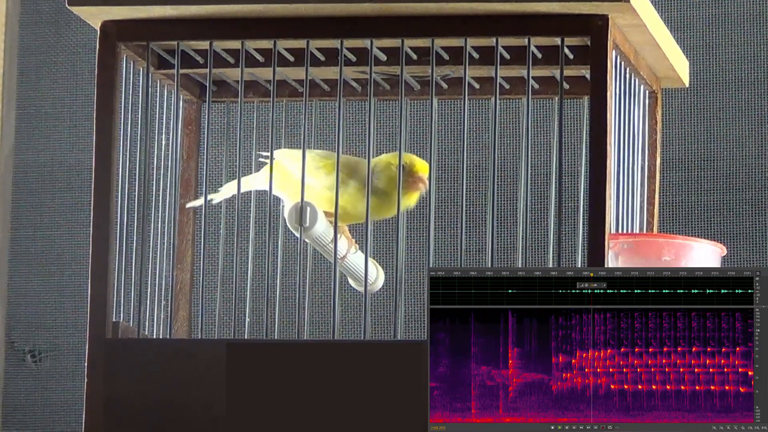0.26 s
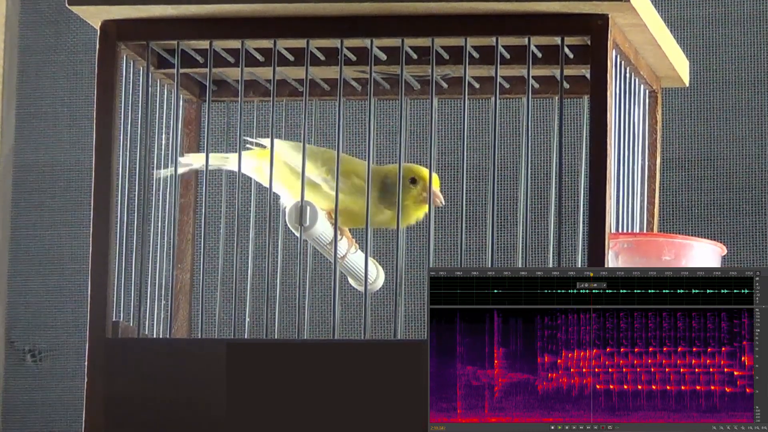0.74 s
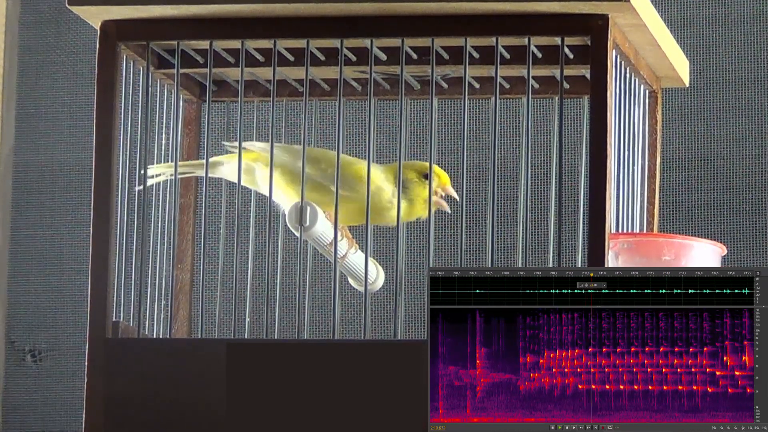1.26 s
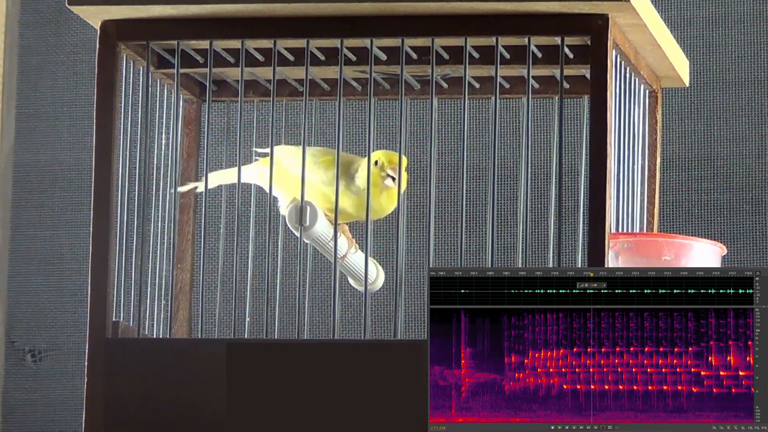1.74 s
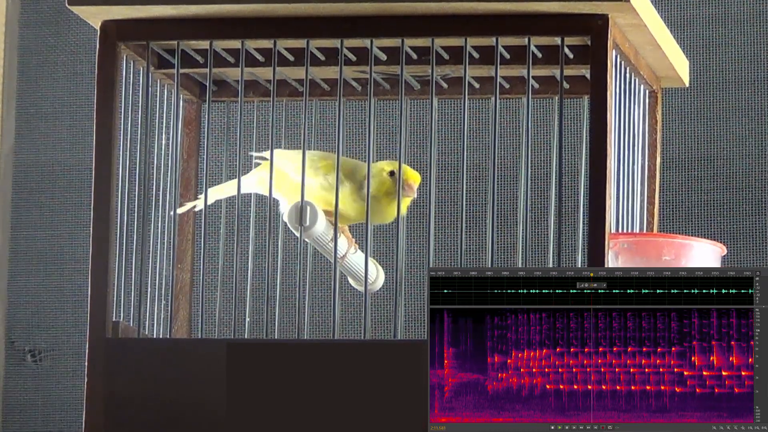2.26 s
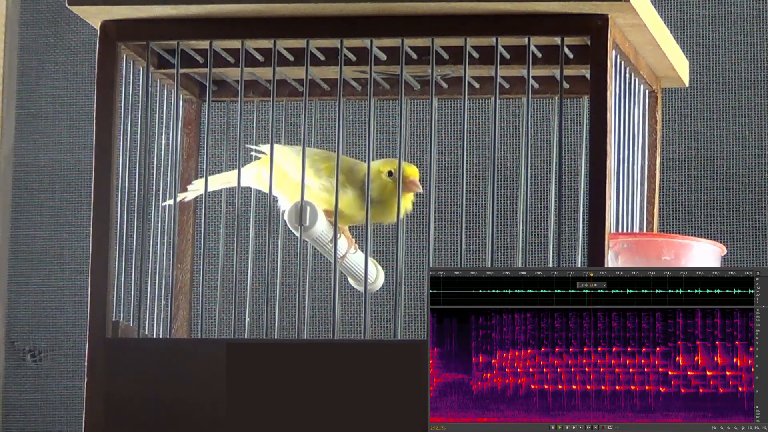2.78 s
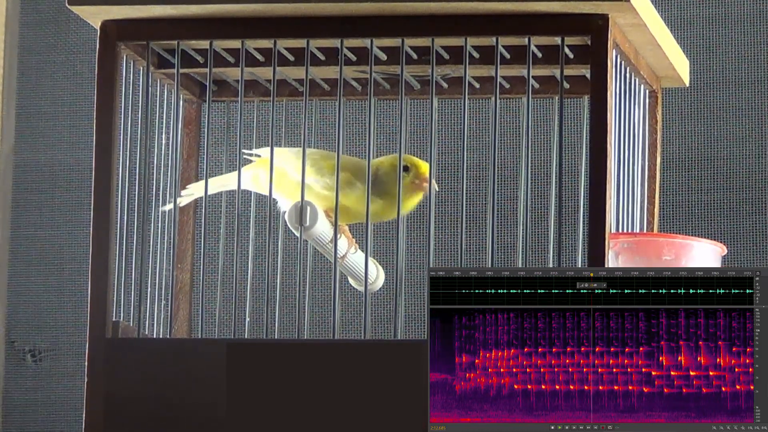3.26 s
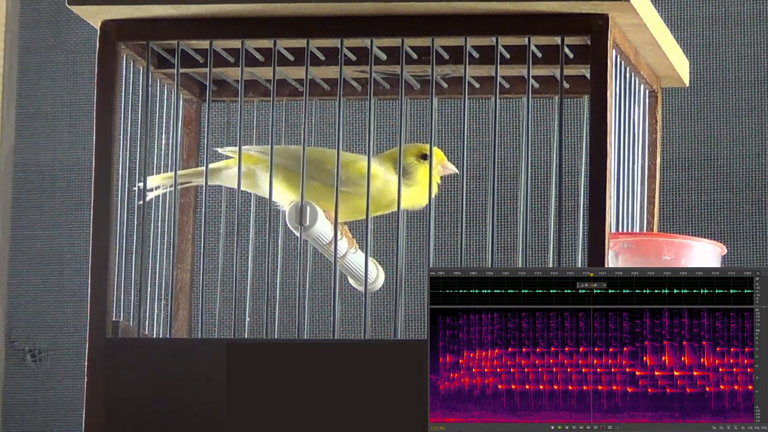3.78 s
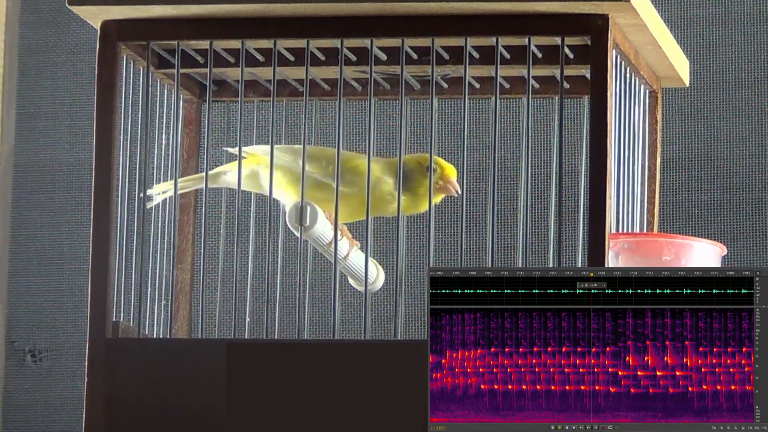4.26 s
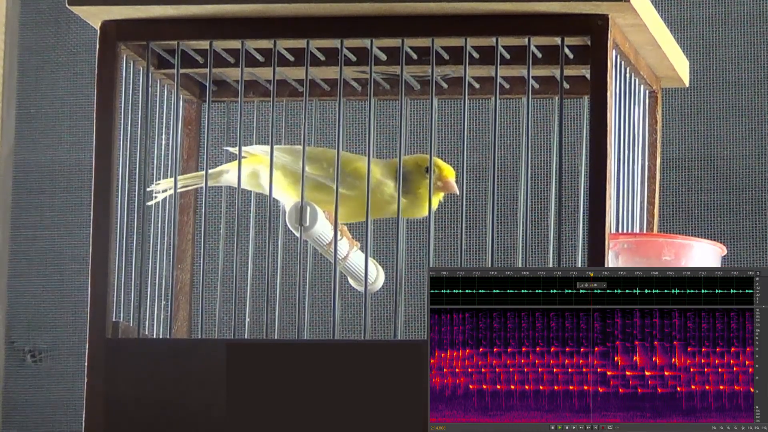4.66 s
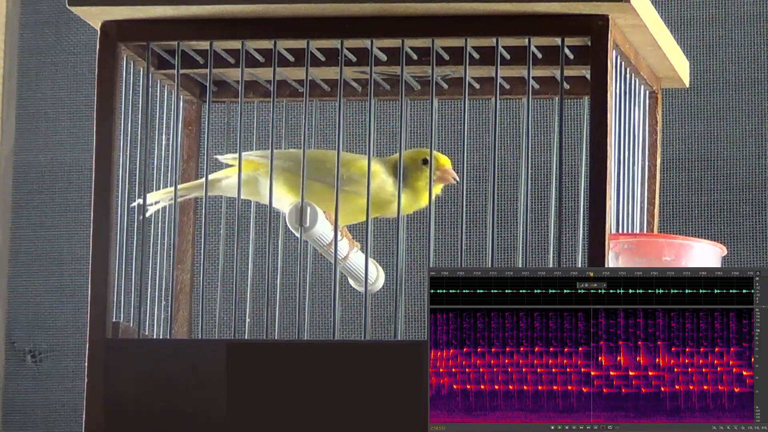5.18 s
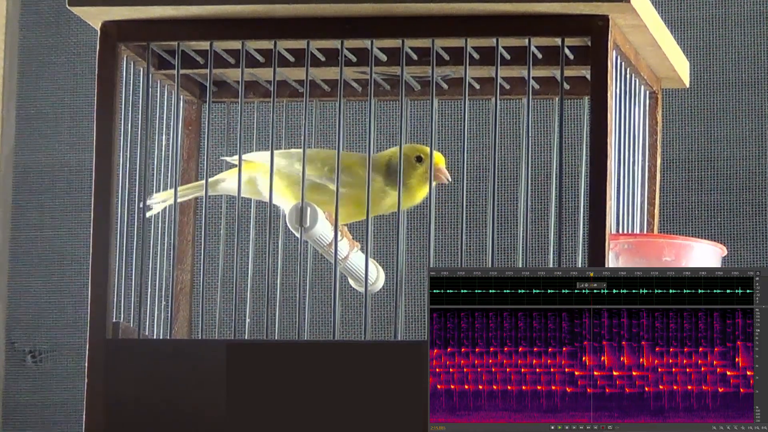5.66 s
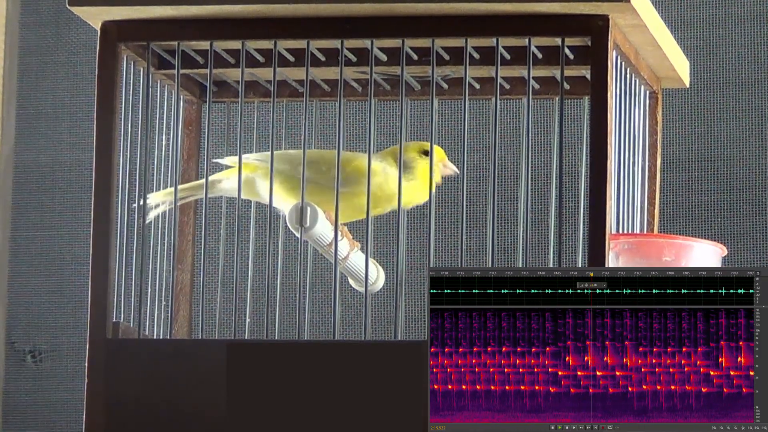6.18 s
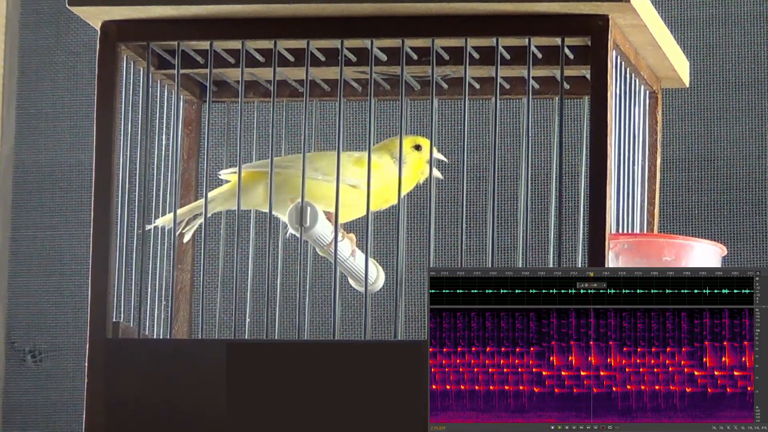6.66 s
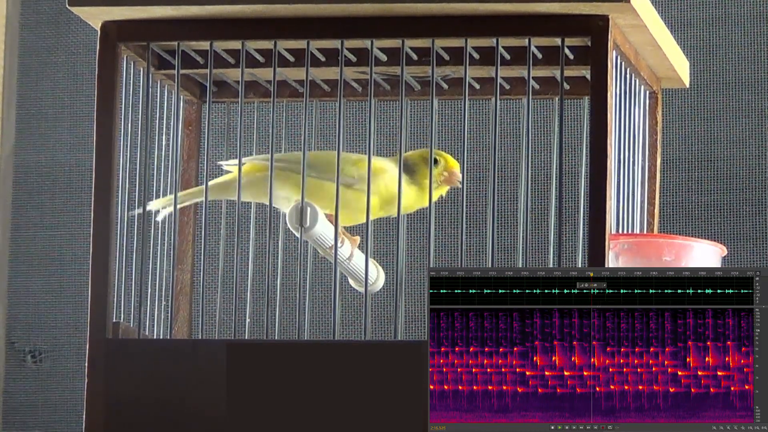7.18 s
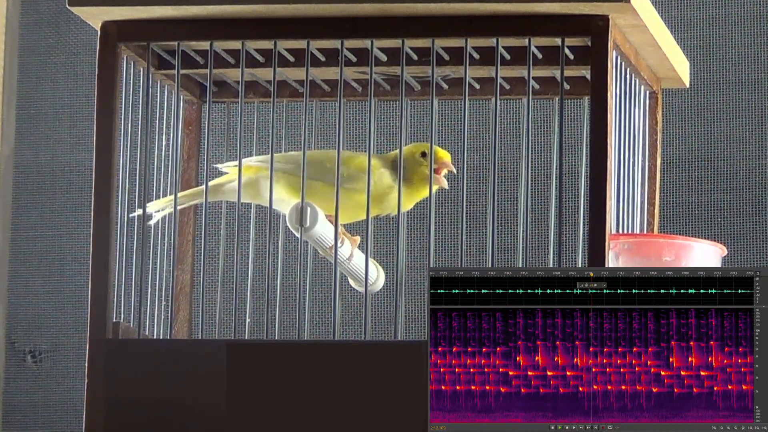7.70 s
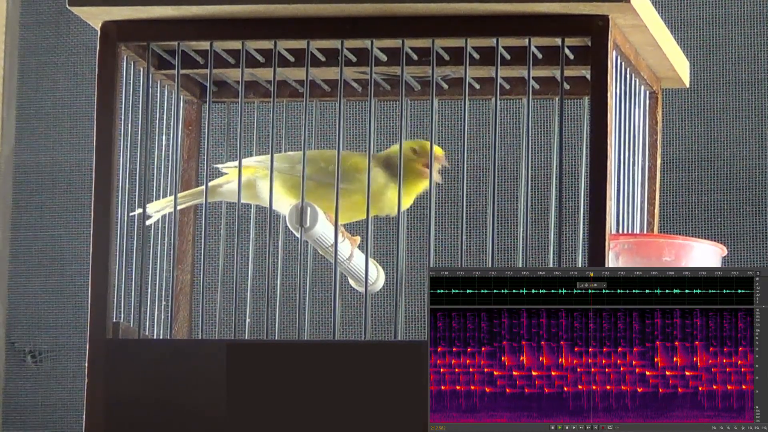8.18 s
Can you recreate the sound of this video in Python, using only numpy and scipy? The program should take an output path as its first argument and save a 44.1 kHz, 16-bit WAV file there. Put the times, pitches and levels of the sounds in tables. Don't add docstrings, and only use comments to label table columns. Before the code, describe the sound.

Close canary song in a small hard room: rapid repeating high whistles, four swooping phrases with piercing drops, then the quick pattern again, faint hum behind.

```python
import sys
import numpy as np
from scipy import signal
from scipy.io import wavfile
from scipy.ndimage import uniform_filter1d

SR = 44100
rng = np.random.default_rng(int(sys.argv[2]) if len(sys.argv) > 2 else 0)


def undo_db(level):
    steps = np.asarray(level, float) / 20
    return 10 ** steps


def output_pcm(signal):
    pcm = np.clip(np.atleast_2d(signal).T, -1, 1) * 32767
    wavfile.write(sys.argv[1], SR, np.round(pcm).astype(np.int16))


N = 372204
PAD = 16384

# head start in seconds, scoop as share of pitch, glide speed,
# place of the peak from 0 to 1, fullness, overtones from the second up in dB, roughness.
LIFT = (0.0073, -0.025, 1.99, 0.61, 1.28, (-27, -27), 0.43)
HIGH = (0.0055, -0.027, 1.9, 0.4, 0.91, (-24, -23.5), 0.64)
MID = (0.001, 0.0068, 1.53, 0.55, 0.64, (-34, -33, -35), 0.64)
LOW = (0.008, 0.072, 1.33, 0.42, 0.71, (-68, -35, -38, -40.5, -42, -44.5), 0.093)
LONG = (.011, .008, 1.55, 0.32, 0.82, (-37, -31.5, -28.5), 0.21)
LEAD_IN = (.013, 0.013, 1.15, 0.78, 1.08, (-24.5, -20), 0.37)
HOOK = (0.006, -0.025, 2.87, 0.65, 0.9, (-29, -29.5), 0.49)
TOP = (0.0033, -0.0085, 3.1, 0.78, 0.4, (-16,), .4)
DROP = (-.002, 0.0016, 4.7, 0.61, 0.91, (-29.5, -24.5), 1)
SINK = (0.011, 0.06, 0.95, 0.61, 0.98, (-56, -33.5, -34, -46, -42, -42), .09)
UP = (0.00082, -0.021, 1.7, 0.46, 0.3, (-26.5, -29), 0.82)
RASP = (0.00079, -0.042, 2.1, 0.46, 0.73, (-23.5, -24), 0.98)
SWOOP = (0.005, -0.01, 2.6, 0.49, 1, (-40, -24.5), .2)
# length in seconds, pitch factor at start, pitch factor at end, manner as above.
TICK = (0.0039, 1.026, 0.92, (0.0013, 0.01, 0.37, 0.31, 1, (-26.5, -25.5), 4.4))
CLICK = (0.027, 1, 1.12, (0.0008, .0035, 0.32, 0.43, 0.98, (-20.5,), 2.6))
CHIP = (0.0078, 1.106, 0.91, (0.00057, 0.0035, 1, 0.48, 5.5, (-31, -29.5, -36), 2.3))
PEEP = (0.018, 0.95, 1.01, (0.00043, -0.046, 2.6, 0.53, 0.69, (-26, -35.5, -34), 0.71))
DIP = (0.01625, 1.4, 0.93, (0.0011, 0.035, 2.89, 0.57, 1.32, (-46.5, -34), 1))
BLIP = (0.0184, 1.6, 0.93, (0.00283, 0.029, 2.8, 0.55, 0.3, (-24,), .3))
GULP = (0.0182, 1.45, 0.826, (0.00169, 0.015, 1.1, 0.25, 0.21, (-56,), .3))
MUTTER = (0.028, 1.1, 1, (0.00395, 0.011, 2.3, 0.24, .4, (-25,), .6))
SHIVER = {HIGH: (0.11, 0.0038), TOP: (0.13, 0.0018), LIFT: (0.31, 0.0028), HOOK: (0.23, 0.0022),
          SWOOP: (0.11, .003), UP: (0.54, 0.02), BLIP[3]: (0.55, 0.018), GULP[3]: (0.54, .03),
          MUTTER[3]: (0.31, 0.045), TICK[3]: (0.16, 0.002), LONG: (0.048, 0.0027), SINK: (0.064, 0.0015),
          RASP: (0.18, 0.013)}
SCOOP_SPAN = {LOW: 0.063, HIGH: 0.11, SINK: 0.12, PEEP[3]: 0.05, LIFT: 0.12, HOOK: 0.096}

# start in seconds, effort in dB.
WARBLES = [
    (-.139, -2.5),
    (.236, -1),
    (0.617, -1),
]
# wait in seconds, length in seconds, from Hz, to Hz, level in dB.
WARBLE_NOTES = [
    (0.021, 0.0096, 3100, 3570, -36),
    (0.025, 0.023, 3980, 4410, -32),
    (0.053, 0.031, 4880, 5340, -25.5),
    (0.072, 0.02, 2600, 2950, -36.5),
    (0.095, 0.013, 2680, 2140, -44.5),
    (0.102, .055, 2108, 2890, -41),
]
# start in seconds, wait for the whistle in seconds,
# lift level in dB, whistle level in dB, lift left-right in dB.
RISES = [(0.097, 0.018, -31, -27.5, 10), (0.472, 0.0077, -24.5, -28.5, 11), (0.844, 0.019, -26, -29, 9),
         (1.268, 0.022, -27, -29.5, 14), (1.705, 0.019, -24, -27, 14), (2.143, 0.02, -25.5, -27, 14),
         (2.582, 0.022, -24.5, -26.5, 17.5), (3.026, 0.02, -25, -27, 17), (3.478, 0.019, -23, -28, 14),
         (3.94, .017, -20, -28.5, 15), (4.397, 0.016, -21.5, -29, 11.5), (4.836, 0.021, -23, -28.5, 15),
         (7.719, 0.016, -19, -28, 12.5), (8.165, 0.015, -21, -25, 11)]
# time in seconds, lift from Hz, lift to Hz, whistle from Hz, whistle to Hz.
REGISTER = [(0.101, 3900, 4220, 4980, 5106), (0.477, 3790, 4210, 4860, 5420),
            (0.848, 3740, 4376, 5160, 5794), (1.269, 4060, 4300, 5665, 5800),
            (2.201, 4120, 4410, 5770, 5824), (3.031, 4160, 4377, 5920, 5904),
            (3.502, 4070, 4360, 5660, 5990), (3.95, 4074, 4416, 5920, 5860), (4.4, 4105, 4420, 5720, 5790),
            (4.841, 4070, 4320, 5914, 5897), (7.72, 4160, 4390, 5886, 5867), (8.17, 4260, 4450, 5740, 5820)]
# start in seconds, mid level in dB, low level in dB,
# low pitch in Hz, mid left-right in dB.
FALLS = [(-.19, -35, -28.5, 2567, -12), (.18, -20.5, -38, 2612, -9.5), (.556, -19.5, -35.5, 2597, -8.5),
         (.938, -21.5, -32, 2273, -3), (1.362, -21.5, -31.5, 2259, -10), (1.799, -22, -31, 2249, -17.5),
         (2.233, -24.5, -30.5, 2250, -18.5), (2.675, -25, -31.5, 2232, -23.5), (3.123, -22, -32, 2197, -13),
         (3.578, -18.5, -33, 2197, 10.5), (4.039, -20, -35, 2209, 10.5), (4.493, -20.5, -34.5, 2207, 3),
         (4.939, -19, -35.5, 2049, 15), (7.819, -19.5, -32.5, 2239, 4), (8.257, -18.5, -30, 2214, 0.5)]
# chip start in seconds, blip level in dB, chip level in dB, dip level in dB.
RATTLES = [(1.078, -59, -28.5, -38), (1.498, -56.5, -29, -38), (1.937, -63.5, -27, -37.5),
           (2.38, -57.5, -25.5, -38.5), (2.821, -60, -27.5, -38), (3.267, -61.5, -26.5, -37.5),
           (3.727, -63, -28.5, -40), (4.185, -57, -28.5, -36.5), (4.639, -56.5, -27.5, -36),
           (7.519, -76, -28.5, -36.5), (7.967, -59, -28, -34.5), (8.405, -55, -26, -36)]
# wait after the chip in seconds, pitch in Hz, left-right in dB.
TUMBLE = [
    (-.022, 1353, 18),
    (.001, 3016, 8),
    (.052, 2170, 17),
    (.067, 1103, 18),
]
# start in seconds, level in dB, pitch in Hz, left-right in dB.
TICKS = [(1.1142, -23, 4660, 2), (1.5348, -22.5, 4610, 4), (1.973, -27.5, 4630, 8), (2.4155, -25, 4654, 12),
         (2.8558, -23, 4735, 9), (3.3037, -25, 4700, 6), (3.7622, -24.5, 4670, 1), (4.2204, -22.5, 4664, 1),
         (4.6736, -22, 4700, 0.5), (7.5562, -21, 4615, -1.5), (8.0035, -21.5, 4630, -1),
         (8.437, -43, 4550, 3)]
# start in seconds, length in seconds, from Hz, to Hz, level in dB, left-right in dB.
STRAY_TICK = (4.926, .01, 5800, 4100, -38, 8.5)
# start in seconds, wait for the peep in seconds,
# starting pitch in Hz, whistle level in dB, peep level in dB.
LONGS = [
    (5.217, 0.12, 3410, -22, -26.5),
    (5.807, 0.13, 3400, -20.5, -26.5),
    (6.403, .124, 3430, -20, -25),
    (7.004, 0.13, 3420, -24.5, -27),
]
# lead in seconds, length in seconds, from Hz, to Hz, level in dB.
SNAPS = [
    (0.027, 0.005, 3900, 4500, -54),
    (.017, .006, 5650, 5750, -53),
]
# start in seconds, wait for the whistle in seconds,
# lift level in dB, whistle level in dB, lift pitch in Hz.
HOOKS = [
    (5.472, 0.012, -17.5, -36, 4689),
    (6.05, 0.025, -17, -30.5, 4691),
    (6.654, 0.019, -18, -28, 4704),
    (7.255, 0.019, -20, -31, 4570),
]
# start in seconds, drop level in dB, dip level in dB, low whistle level in dB,
# low pitch in Hz.
DROPS = [
    (5.576, -18.5, -48.5, -35.5, 2002),
    (6.158, -16.5, -50, -35.5, 2004),
    (6.76, -19.5, -47.5, -34, 2005),
    (7.367, -18, -56, -32.5, 2107),
]

HEAD_LAG = {SINK: [(5.6, 0.54)], LOW: [(3.4, 1.3), (4.2, 0.48)], LONG: [(6.0, 0.93), (6.3, 2)],
            MID: [(.5, 1.44), (.9, 1.03), (1.4, 4.5), (1.8, 0.011), (3.2, 0.011), (3.5, 3.9)],
            CHIP[3]: [(3.4, -0.78), (3.7, 0.041)], PEEP[3]: [(5.0, -1.57)], DIP[3]: [(4.8, 2.17),
            (7.5, 0.013)]}
# time in seconds, added left-right in dB.
SWING = [(0, 2.5), (1.2, 1.7), (2.2, -2), (3.1, -2.5), (3.7, 2), (4.3, 1.5), (4.8, 0.5), (5.3, 3), (5.7, 1),
         (6.2, 2), (6.7, 1.5), (7.2, 5), (7.7, 0), (8.3, -1.4)]
# time in seconds, added left-right in dB.
LOW_SIDES = [(0.938, -0.5), (1.362, -0.8), (1.799, 4.5), (2.233, 6.5), (2.675, 8.5), (3.123, 8),
             (3.578, 2.5), (4.039, 3), (4.493, 8), (4.939, -3), (7.819, 5), (8.257, -1.5)]
MID_SIDES = [(0.18, 1.5), (0.556, -2), (0.938, -3.5), (1.362, 6.5), (1.799, 11.5), (2.233, 11.5), (2.675, 8),
             (3.123, 7.5), (3.578, -1.5), (4.039, -2), (4.493, 0), (4.939, -3.5), (7.819, 3.5), (8.257, 1.5)]
HIGH_SIDES = [(0.097, -2), (0.471, 2.5), (0.845, -1.8), (1.268, -4.5), (1.703, 0.5), (2.141, -2),
              (2.58, -2.5), (3.028, -2.5), (3.477, -1), (3.94, -3), (4.397, -3), (4.836, -4), (7.718, -4.5),
              (8.165, -5.5)]
LONG_SIDES = [(5.219, -5), (5.807, -3.5), (6.403, -2.5), (7.003, 0.5)]
TOP_SIDES = [(5.472, 0), (6.05, -10), (6.654, 1.5), (7.255, -6)]
SINK_SIDES = [(5.576, 2), (6.157, -1.5), (6.759, -3), (7.367, 5.5)]
HOOK_SIDES = [(5.472, -3.5), (6.05, -9), (6.654, 1.2), (7.255, -11)]

# delay in seconds, gain.
SPRAY = [
    [(0, 0.55), (.0031, 0.18), (.0056, 0.53), (.0085, -0.32), (.0117, 0.33), (.0187, 0.2), (.029, -0.24)],
    [(0, .95), (.0086, 0.14), (.013, -0.025), (.0258, -0.31)],
]
REBOUND = [
    [(0, 0.69), (.0023, 1), (.0045, -0.45), (.0098, 0.12), (.0145, 0.15), (.0185, -0.17), (.023, 0.19),
     (.027, -0.18)],
    [(.0002, 0.92), (.0041, .35), (.007, -0.1), (.0105, -1.1), (.019, 0.052), (.0265, -0.041)],
]
BOX_WALLS = [
    [(.0018, 0.2), (.0029, 0.089), (.0044, 0.24)],
    [(.0011, 1), (.0024, 0.25), (.0039, -1.3)],
]
ROOM_WALLS = [
    [(.0078, .16), (.0125, .24), (.0195, -.18)],
    [(.0069, -.16), (.0135, .22), (.021, .2)],
]
# frequency in Hz, time to fall by 60 dB in seconds.
ROOM_DECAY = [(1000, 1), (2200, 0.84), (3500, 1), (4500, 0.65), (6000, 0.57), (9000, 0.36), (14000, 0.4)]
# left in dB, right in dB.
ROOM_DB = [-0.5, -4]

# frequency in Hz, level in dB per Hz.
AIR_SPECTRUM = [(20, -26.5), (40, -31), (87, -14.5), (177, -18.5), (244, -18), (440, -21.5), (575, -22.5),
                (925, -28), (1700, -31), (2500, -25.5), (6000, -45), (9000, -48), (16000, -70)]
# frequency in Hz, left-right in dB.
AIR_SIDES = [(28, 27), (55, 8), (380, 10.5), (2380, 7.5), (15000, 11)]
# time in seconds, level in dB.
AIR_SWELL = [(0, -50.5), (1.2, -55.5), (2.6, -52), (3.798, -55.5), (5.4, -57), (6.802, -59.5), (8.44, -62)]
# time in seconds, firing pitch in Hz, level in dB.
DRONE = [(0, 222, -53), (1.499, 190, -55.5), (1.901, 188, -63.5), (2.2, 180, -59.5), (3.2, 172, -56.5),
         (3.751, 168, -67), (4.3, 166, -58.5), (5, 170, -61.5), (5.201, 170, -54), (5.6, 170, -53.5),
         (5.801, 178, -67), (6.349, 185, -65), (6.551, 135, -63.5), (7.099, 138, -66.5), (7.4, 144.8, -63),
         (8.44, 165, -64)]
# multiple of the firing pitch, level in dB, line width in Hz.
DRONE_ORDERS = [
    (1, -7.5, 1.76),
    (1.1, -13.5, 2.1),
    (2, -19, 1.7),
    (3, -18, 5.6),
]
# middle in seconds, half length in seconds, throb rise in dB, hum rise in dB.
LORRIES = [
    (2.72, 0.66, 9.5, 11),
    (5.5, 1, 8, 7),
    (3.75, 0.43, 9.5, -5),
    (1.9, .4, 10, 8),
]


def evened(x):
    return x / np.sqrt(np.mean(x ** 2) + 1e-20)


def wobble(count, hz):
    return evened(signal.lfilter([1], [1, -np.exp(-2 * np.pi * hz / SR)], rng.standard_normal(count)))


def bandpass(x, edges_hz):
    return signal.sosfilt(signal.butter(2, edges_hz, "band", fs=SR, output="sos"), x)


def left_right(db):
    return undo_db(np.array([[db], [-db]]) / 2)


def side_shift(manner, s):
    turns = {LOW: LOW_SIDES, MID: MID_SIDES, HIGH: HIGH_SIDES, LONG: LONG_SIDES, LEAD_IN: LONG_SIDES,
             TOP: TOP_SIDES, SINK: SINK_SIDES, HOOK: HOOK_SIDES}
    table = turns.get(manner, [(0, 0)])
    nearest = min(table, key=lambda row: abs(row[0] - s))
    return np.interp(s, *np.transpose(SWING)) + nearest[1]


def note(row, manner, waver, rasp=0):
    s, length, early_hz, late_hz, db, pan_db = row
    lead, scoop, speed, peak, full, overtones_db, rough = manner
    u = np.linspace(0, 1, round((length + lead) * SR))
    start = PAD + round(s * SR)
    drift, flutter, grain, shiver, breath = waver[:, start:start + len(u)]
    u = u[:len(breath)]
    level_share, pitch_share = SHIVER.get(manner, (0, 0))

    glide = (np.exp(-speed * u) - np.exp(-speed)) / (1 - np.exp(-speed))
    bend = 1 + scoop * np.exp(-u / SCOOP_SPAN.get(manner, 0.1343))
    bend = bend + 0.0035 * drift + pitch_share * shiver
    hz = (late_hz + (early_hz - late_hz) * glide) * bend
    turns = 2 * np.pi * np.cumsum(hz) / SR
    lag = np.interp(s, *np.transpose(HEAD_LAG.get(manner, [(0, 0.003)])))

    skew = np.log(0.5) / np.log(np.clip(peak, 0.1, 0.9))
    swell = np.sin(np.pi * u ** skew).clip(0) ** max(full, 0.55)

    upper = 0
    for k, over_db in enumerate(overtones_db, 2):
        upper = upper + undo_db(over_db) * np.sin(k * turns) * (k * hz < SR / 2.2)
    upper = upper * swell ** 0.041 * (1 + rough ** 2 * grain) / np.sqrt(1 + rough ** 4)
    hiss = 0.002 * rough * breath
    tone = np.sin(turns - np.array([[0], [lag]])) + upper * left_right(2.5) + hiss

    unsteady = 1 + 0.023 * flutter + level_share * shiver + 0.029 * min(rough, 1) * grain
    sound = np.sqrt(2) * undo_db(db) * swell * unsteady * tone
    sound *= 1 + rasp * np.cos(2 * np.pi * 263.6 * u * (length + lead))
    pan_db = pan_db + side_shift(manner, s)
    return s - lead, sound * left_right(pan_db) / np.sqrt(np.cosh(pan_db / 14.9))


def short(kind, s, hz, db, pan_db):
    length, first, last, manner = kind
    return (s, length, hz * first, hz * last, db, pan_db), manner, 0


def until(s, times):
    return min([t - s for t in times if t > s] + [1])


def warbles():
    pan_db = 10
    for s, effort_db in WARBLES:
        yield short(MUTTER, s, 1802, -51 + effort_db, pan_db)
        for (wait, length, a, b, db), manner in zip(WARBLE_NOTES, (UP, UP, RASP, UP, UP, UP)):
            rasp_depth = 1 * (manner is RASP)
            yield (s + wait, length, a, b, db + effort_db, pan_db), manner, rasp_depth


def trill():
    settled_s = 0.7
    at, *pitches = np.transpose(REGISTER)
    falls = [row[0] for row in FALLS]
    for s, wait, lift_db, high_db, pan_db in RISES:
        a, b, c, d = (np.interp(s, at, hz) for hz in pitches)
        yield (s, wait + 0.0071, a, b, lift_db, pan_db), LIFT, 0
        hold = until(s + wait, falls) - 0.0043 - 0.012 * (s < settled_s)
        yield (s + wait, hold, c, d, high_db, 13), HIGH, 0

    blips = [row[0] + TUMBLE[0][0] for row in RATTLES] + [row[0] for row in WARBLES]
    for s, mid_db, low_db, hz, pan_db in FALLS:
        yield (s, 0.025, 3590, 3551.3, mid_db, pan_db), MID, 0
        low_s = s + 0.023
        hold = min(until(low_s, blips) - 0.0081, 0.13)
        low_pan_db = 16.5 + 0.38 * pan_db
        if s < settled_s:
            yield (s + 0.013, 0.039, hz * 0.93, hz * 1.03, low_db, low_pan_db), SWOOP, 0
        else:
            yield (low_s, hold, hz * 1.024, hz, low_db, low_pan_db), LOW, 0

    for s, blip_db, chip_db, dip_db in RATTLES:
        levels_db = blip_db, chip_db, dip_db, dip_db - 20.5
        for kind, (wait, hz, pan_db), db in zip((BLIP, CHIP, DIP, GULP), TUMBLE, levels_db):
            yield short(kind, s + wait, hz, db, pan_db)
    for s, db, hz, pan_db in TICKS:
        yield short(TICK, s, hz, db, pan_db)
    yield STRAY_TICK, CLICK[3], 0


def flourish():
    lead_in_s, long_hz, long_pan_db = 0.026, 3251, 9.5
    sag_hz = long_hz * 1.016
    for s, wait, hz, long_db, peep_db in LONGS:
        yield (s, lead_in_s, hz, sag_hz, long_db - 7, long_pan_db), LEAD_IN, 0
        yield (s + lead_in_s, 0.082, sag_hz, long_hz, long_db, long_pan_db), LONG, 0
        for lead, *snap in SNAPS:
            yield (s + wait - lead, *snap, 11.5), CLICK[3], 0
        yield short(PEEP, s + wait, 2600, peep_db, 4.5)

    drops = [row[0] for row in DROPS]
    for s, wait, lift_db, top_db, hz in HOOKS:
        pan_db = 6 + 4.5 * (s - HOOKS[0][0])
        yield (s, 0.031, hz * 0.95, hz, lift_db, pan_db), HOOK, 0
        hold = until(s + wait, drops) + 0.0026
        yield (s + wait, hold, 6720, 6955, top_db, 15), TOP, 0

    for s, drop_db, dip_db, low_db, hz in DROPS:
        yield (s, 0.03, 7650, 4043, drop_db, 11), DROP, 0
        yield short(DIP, s + 0.015, 2170, dip_db, 17)
        yield (s + 0.032, 0.085, hz * 1.065, hz, low_db, 18), SINK, 0


def add(mix, s, sound):
    part = mix[:, PAD + round(s * SR):][:, :sound.shape[1]]
    part += sound[:, :part.shape[1]]


def echoes_of(table):
    taps = np.zeros((2, 2048))
    for side, echoes in zip(taps, table):
        for delay, gain in echoes:
            np.add.at(side, round(delay * SR), gain)
    return taps


def canary():
    size = N + PAD
    treble = signal.butter(2, 6000, "high", fs=SR, output="sos")
    breath = evened(signal.sosfilt(treble, rng.standard_normal(size)))
    drift, flutter = wobble(size, 55), wobble(size, 44)
    grain = evened(uniform_filter1d(wobble(size, 1700), size=24))
    shiver = evened(bandpass(flutter, (68.5, 245)))
    waver = np.array([drift, flutter, grain, shiver, breath])

    song, chips, ticks = np.zeros((3, 2, size))
    for row, manner, rasp in (*warbles(), *trill(), *flourish()):
        if manner is TICK[3]:
            layer = ticks
        elif manner == CHIP[3]:
            layer = chips
        else:
            layer = song
        add(layer, *note(row, manner, waver, rasp))
    return song + signal.oaconvolve(chips, echoes_of(SPRAY), axes=1)[:, :size], ticks


def rebounds(ticks):
    return signal.oaconvolve(ticks, echoes_of(REBOUND), axes=1)[:, :ticks.shape[1]]


def box(song):
    taps = echoes_of(BOX_WALLS) + echoes_of(ROOM_WALLS)
    taps[0, 0] += 1
    taps[1, 7] += 1
    return signal.oaconvolve(song, taps, axes=1)[:, :song.shape[1]]


def read(points, hz):
    f, value = np.transpose(points)
    return np.interp(np.log(hz + 1), np.log(f + 1), value)


def room(song):
    taps = np.zeros((2, SR))
    at = np.arange(200, SR - 20, 20) + rng.integers(0, 20, (2, (SR - 201) // 20))
    np.put_along_axis(taps, at, rng.choice([-1., 1.], at.shape), 1)
    taps *= 1 - np.exp(-np.arange(SR) / SR / 0.0013)
    hz, t, z = signal.stft(taps, SR, nperseg=256)
    decay = undo_db(-60 * t / read(ROOM_DECAY, hz)[:, None])
    tail = signal.istft(z * decay, SR, nperseg=256)[1]
    tail *= undo_db(np.array(ROOM_DB))[:, None] / np.linalg.norm(tail[0])
    source = 0.21 * song.mean(0) + 0.11 * song
    return signal.fftconvolve(source, tail, axes=1)[:, :song.shape[1]]


def air():
    frames, hz = N // 512 + 5, np.fft.rfftfreq(2048, 1 / SR)
    a, b, c, d, patches = rng.standard_normal((frames, 1025, 5)).T
    patches = evened(uniform_filter1d(uniform_filter1d(patches, 4, 0), 30, 1))
    patches_db = 3.5 * patches * (hz < 900)[:, None]
    sides_db = np.array([.5, -.5])[:, None, None] * read(AIR_SIDES, hz)[:, None]
    level_db = read(AIR_SPECTRUM, hz)[:, None] + sides_db + patches_db
    z = np.array([a + 1j * b, c + 1j * d]) * undo_db(level_db)
    wash = evened(signal.istft(z, nperseg=2048, noverlap=1536)[1][:, :N])
    at = np.arange(frames) * 512
    swell_db = np.interp(at / SR, *np.transpose(AIR_SWELL))
    return wash * undo_db(-5.5 + np.interp(np.arange(N), at, swell_db))


def drone():
    s, hz, db = np.transpose(DRONE)
    t = np.arange(N) / SR
    turns = 2 * np.pi * np.cumsum(np.interp(t, s, hz)) / SR
    lines = np.zeros((2, N))
    for k, order_db, width_hz in DRONE_ORDERS:
        steady = 0.85 * (k < 1.01)
        for side in lines:
            in_phase = (steady + wobble(N, width_hz)) * np.cos(k * turns)
            side += undo_db(order_db) * (in_phase + wobble(N, width_hz) * np.sin(k * turns))
    lines = signal.sosfilt(signal.butter(4, 900, fs=SR, output="sos"), lines)
    return undo_db(np.interp(t, s, db)) * lines * undo_db(np.array([[2.5], [-3.5]]))


def rumble():
    t = np.arange(N) / SR
    middle, half, throb_rise_db, hum_rise_db = np.transpose(LORRIES)[:, :, None]
    near = np.exp(-((t - middle) / half) ** 4)
    out = np.zeros((2, N))
    throb = -70, throb_rise_db, (17, 31), -22
    hum = -80.5, hum_rise_db, (60, 66), -6
    for db, rise_db, edges_hz, right_db in (throb, hum):
        band = evened(bandpass(rng.standard_normal((2, N)), edges_hz))
        out += band * undo_db(db + (rise_db * near).sum(0) + np.array([[4.5], [-7 + right_db]]))
    return out


def scene():
    song, ticks = canary()
    bird = box(song) + rebounds(ticks) + room(song + 1.2 * ticks)
    return bird[:, PAD:] + air() + drone() + rumble()


def roll_off(x):
    return signal.sosfilt(signal.butter(12, 16460, fs=SR, output="sos"), x)


def record(dry):
    treble = signal.butter(6, 6300, "high", fs=SR, output="sos")
    sums = signal.sosfilt(treble, 0.11 * dry ** 2 + 0.4 * dry ** 3)
    edge = signal.firwin(255, 16150, window=("kaiser", 9), fs=SR)
    return roll_off(signal.oaconvolve(dry + sums, edge[None], "same"))


dry = scene()
out = record(dry)
output_pcm(out)
```